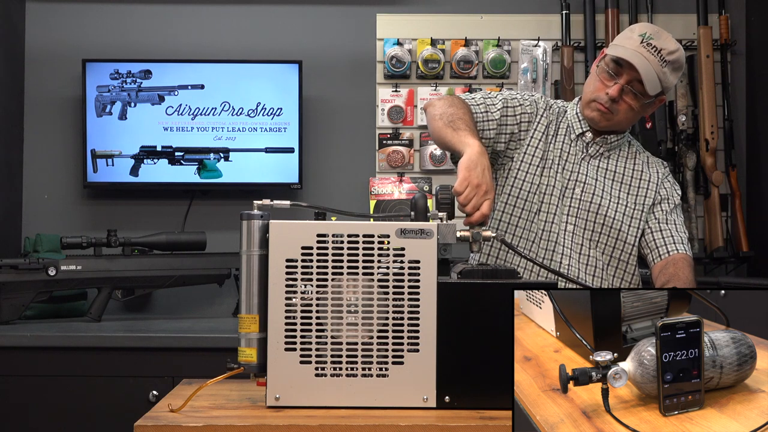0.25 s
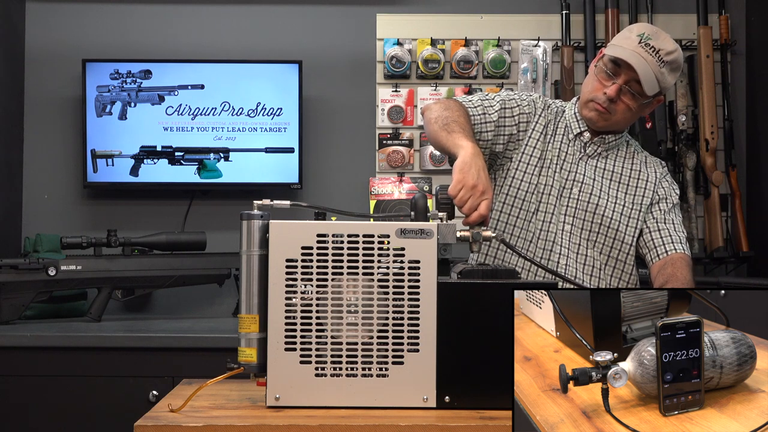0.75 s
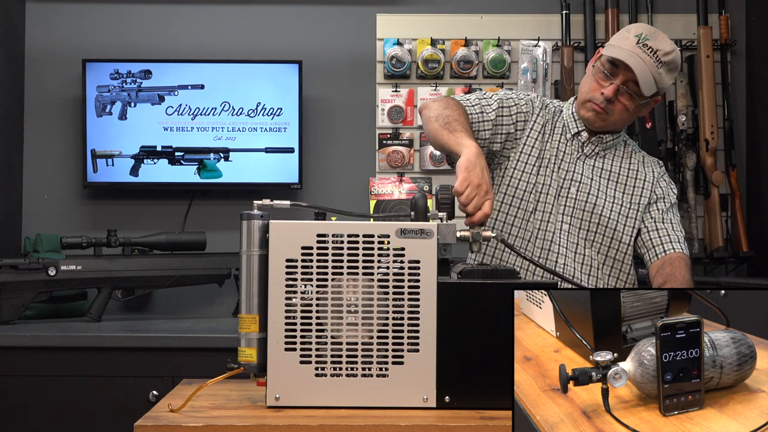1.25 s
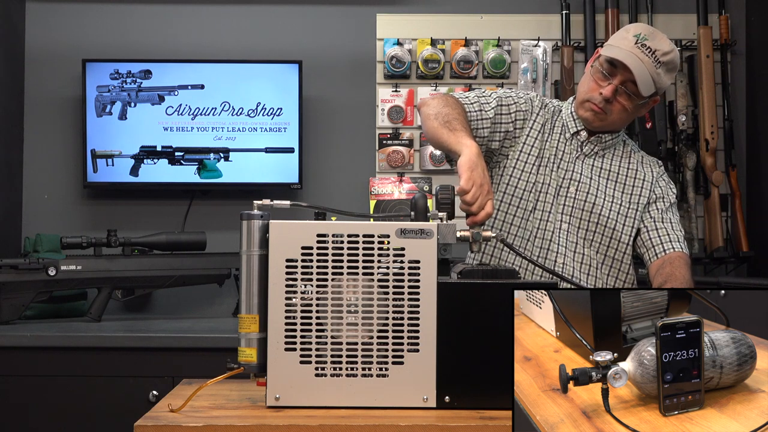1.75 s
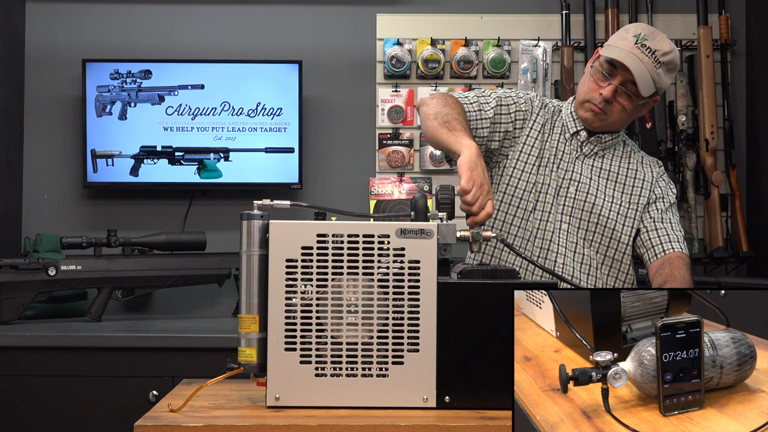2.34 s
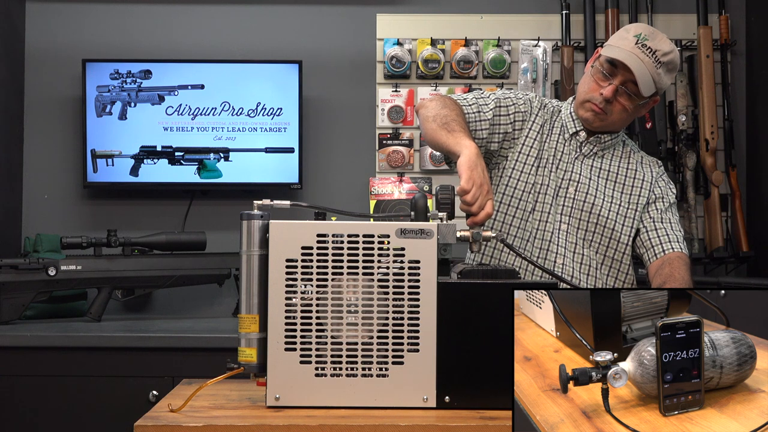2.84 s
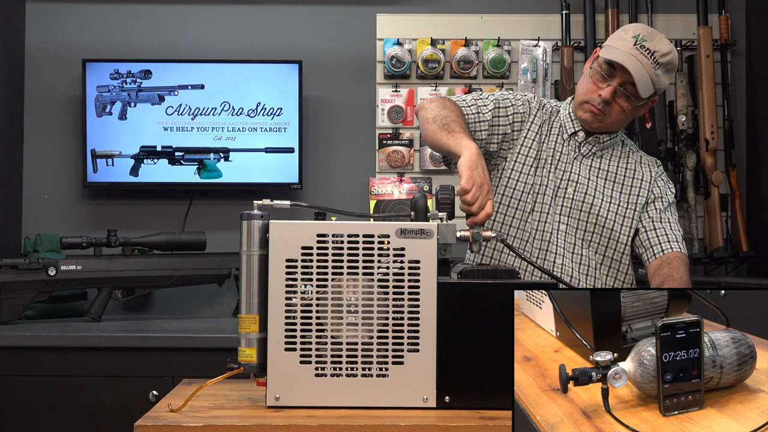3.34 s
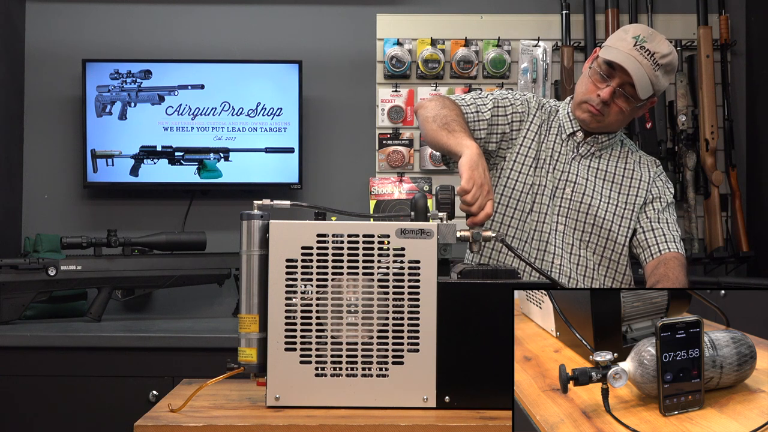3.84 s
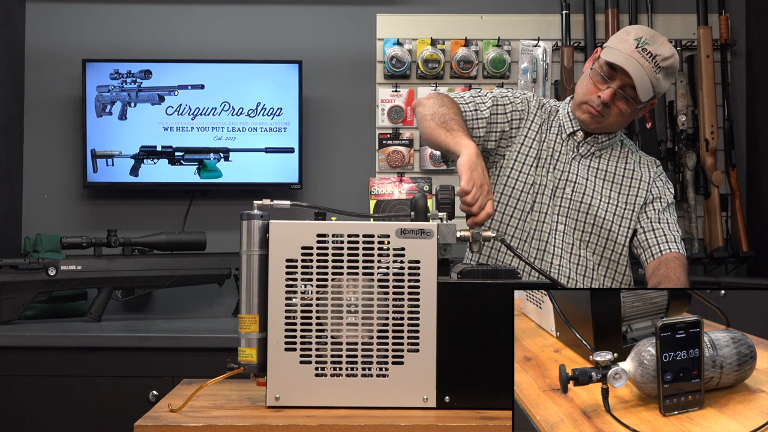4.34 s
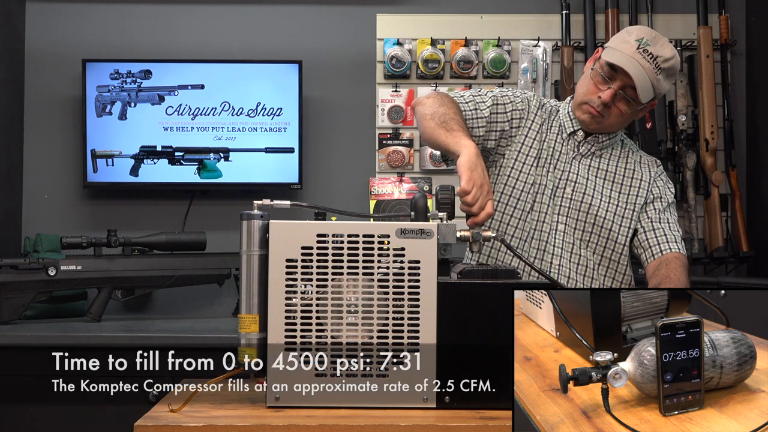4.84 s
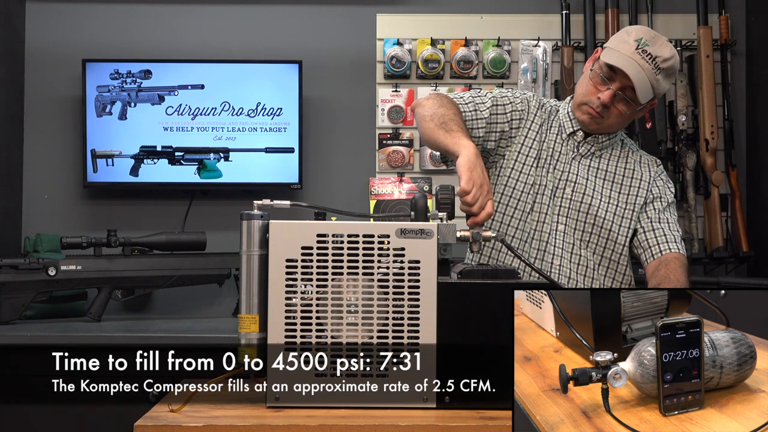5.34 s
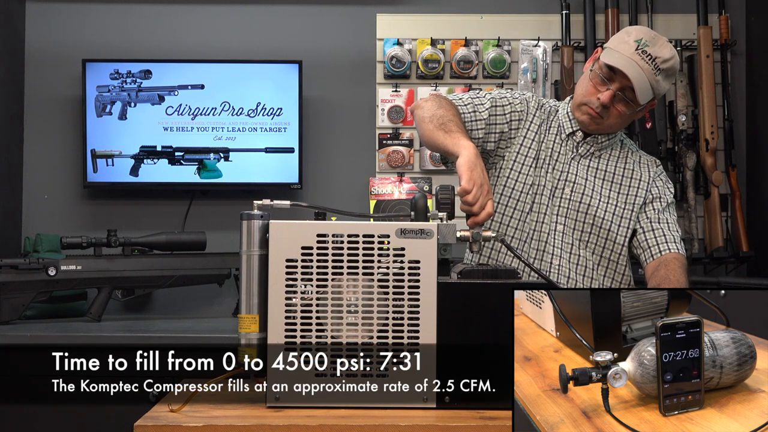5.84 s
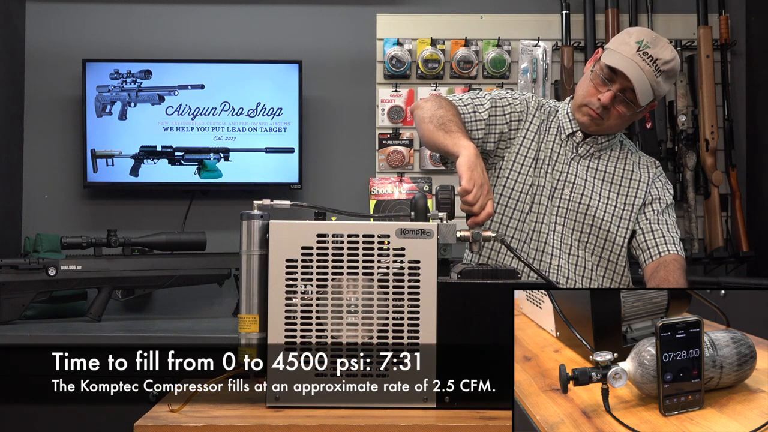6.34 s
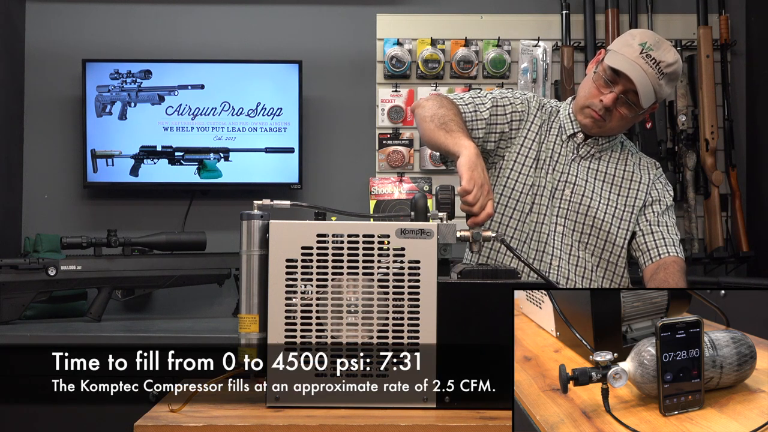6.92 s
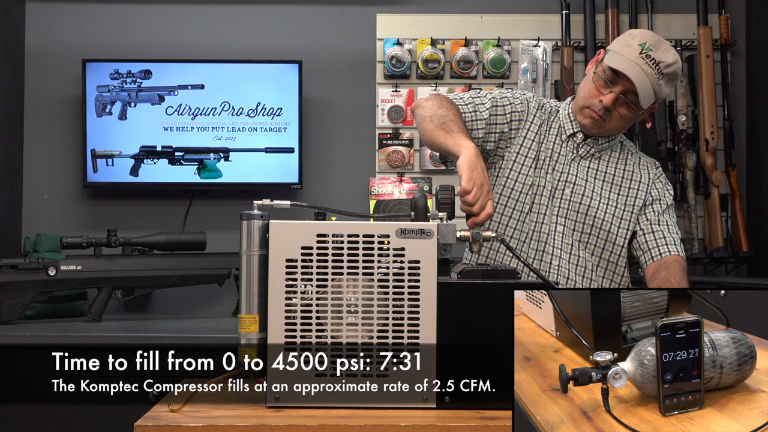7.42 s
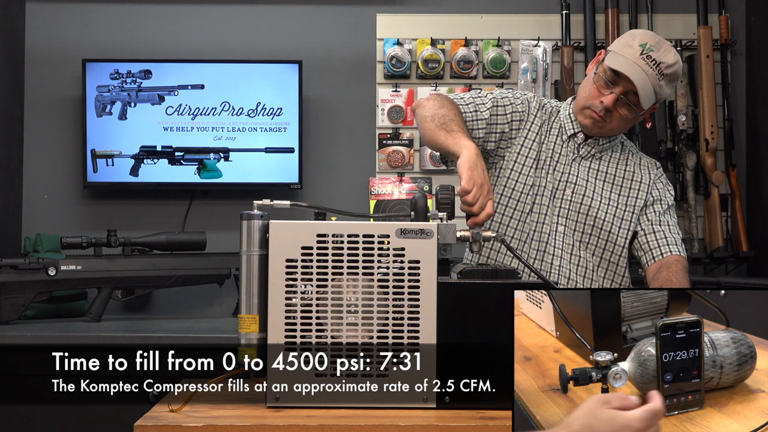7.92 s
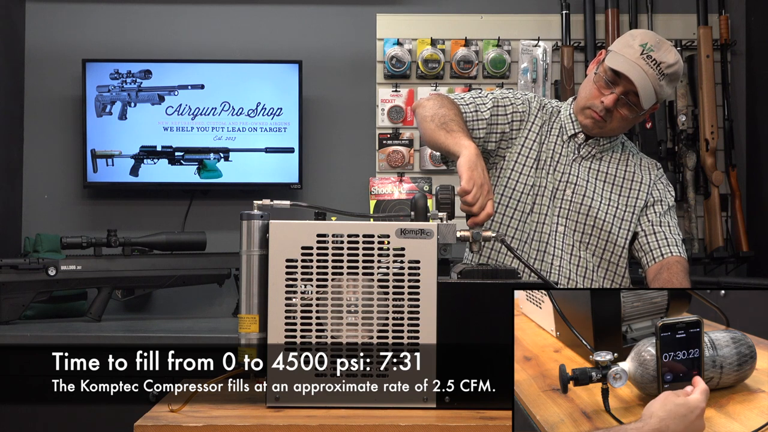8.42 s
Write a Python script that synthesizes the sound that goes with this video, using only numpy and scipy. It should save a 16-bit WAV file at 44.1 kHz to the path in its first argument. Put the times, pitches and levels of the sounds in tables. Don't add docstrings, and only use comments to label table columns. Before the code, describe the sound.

Close, almost mono capture in a small, dry workshop. Harsh compressed air is already rushing at the start, then chokes off quickly into a weak fading seep over quiet rumble and hum. After roughly a second the jet snaps open again, slightly softer, and keeps blowing continuously. Its hissing colour flutters and slides with the fingers round the knob, with brief watery, ringing emphasis in the later half.

```python
import sys
import numpy as np
from scipy import signal
from scipy.fft import rfft, irfft
from scipy.io import wavfile
from scipy.ndimage import uniform_filter1d

SR = 44100
rng = np.random.default_rng(int(sys.argv[2]) if len(sys.argv) > 2 else 0)


def file_out(sig):
    cols = np.atleast_2d(sig).T
    lim = np.clip(cols, -1, 1)
    pcm = np.round(lim * 32767).astype(np.int16)
    wavfile.write(sys.argv[1], SR, pcm)


def gain_from_db(level_db):
    decades = np.asarray(level_db, float) / 20
    return 10 ** decades


N = 382788
FRAME = 1024

# [f/Hz, density/dB]
SHOP_RUMBLE = [(12, -42), (20, -11), (64, -2), (86, -18), (237, -15), (495, -18), (632, -12), (1000, -29),
               (1300, -51), (2200, -120)]
# [f/Hz, rms level/dB]
HUM = [(59.2, -79), (236.9, -80.5)]
# [t/s, peak level/dB, f/Hz]
KNOCKS = [
    (.965, -63, 36),
    (1.59, -63, 38),
]
# [t/s, low f/Hz, high f/Hz, level/dB]
SIDE_BURSTS = [(0.575, 6800.0, 8360.0, -26), (0.578, 12400.0, 13790.0, -36.8),
               (1.898, 11710.0, 14480.0, -33.4), (2.364, 14550.0, 15850.0, -45.0),
               (2.366, 11710.0, 13100.0, -37.0), (2.83, 11020.0, 12900, -33.7),
               (3.479, 9550.0, 11030.0, -31.8), (3.481, 13090.0, 14480.0, -40.4),
               (3.852, 13090.0, 14480.0, -38.1), (5.939, 4130.0, 5260.0, -30), (5.94, 8300, 9650.0, -24),
               (6.498, 11020.0, 12410.0, -33.1), (7.567, 13780.0, 15850.0, -38.7),
               (7.568, 10330.0, 11810.0, -30.6), (8.403, 8240, 9740.0, -25), (8.669, 6880.0, 9740.0, -30),
               (8.669, 14460.0, 15850.0, -41.9)]

# [f/Hz, density/dB]
LEAK_HISS = [(250.0, -27), (500.0, -18.5), (1200.0, -17), (2200.0, -9.5), (3300.0, 0.5), (5000.0, -6.5),
             (7500.0, -11), (9500.0, -10.2), (11500.0, -24), (15650.0, -28.8)]
# [f/Hz, width/Hz, level/dB]
LEAK_FITTINGS = [(1620, 120.0, 5), (1780, 190.0, -6), (2140.0, 120.0, -9), (2970, 270, 9),
                 (3200, 230.0, -4), (3600.0, 84, 8.5), (4100.0, 360, -5), (5240.0, 410.0, 5.5),
                 (6100.0, 170.0, -4.6), (6830.0, 220.0, 4), (7420.0, 290.0, 5), (8080.0, 900.0, -6.5),
                 (8570.0, 400.0, 8.1), (9530.0, 380.0, 5.5), (9990.0, 300.0, -5.6), (10670.0, 360.0, -3.2),
                 (11570.0, 760.0, 3.6), (12680.0, 210.0, -2.9), (13440.0, 350.0, -4.0),
                 (15590.0, 900.0, 2.8)]

# [f/Hz, density/dB]
JET_ROAR = [(20, -34.5), (250.0, -30), (500.0, -22), (900.0, -16), (1400.0, -9.5), (2200.0, -14),
            (3500.0, -6.5), (5500.0, -2.5), (9000.0, 0.5), (12500.0, -9), (15650.0, -14)]
# [f/Hz, width/Hz, level/dB]
HOUSING = [(1070, 130.0, -2.2), (1535, 180, 2), (2380, 91, 3.5), (2670, 320, -2.5), (2780, 90, 5),
           (3594, 180, 3), (4370, 250, 3), (4830, 170, -1.2), (5880, 150, 2.5), (6040, 180, -2.5),
           (6540, 380, 2), (7360, 230, 2.5), (8340, 190, 1.5), (11650, 200, 2)]
# [t/s, jet level/dB]
FLOW = [(.3, -14), (1.86, -15), (2.32, -17), (2.44, -15), (2.8, -17), (3.49, -17), (3.82, -19.5),
        (4.47, -19), (4.53, -19.5), (4.61, -15.5), (4.97, -18), (5.49, -18), (5.55, -16.5), (5.97, -19.5),
        (6.24, -17), (6.72, -19.5), (7.59, -16.5), (8.68, -19)]
# [t/s, level/dB, fading/s]
SPITS = [
    (2.45, 2, 0.63),
    (4.63, 4.5, .45),
    (5.62, 3, .4),
    (5.9, 6.5, 0.73),
    (6.55, 5.5, 0.75),
    (6.85, 3.5, 0.36),
]

# [f/Hz, width/Hz, level/dB]
CUPPED = [(1050, 500, 1.5), (2860, 370, 4), (3610, 360, 3), (5260, 660, 7), (6460, 270, 3),
          (7200, 250, 1.2), (8070, 420, -5.5), (8650, 420, 5), (9420, 270, 5), (9860, 300, -1.5),
          (11000, 320, 0.5), (11900, 400, 0.5), (13300, 700, -3), (14200, 450, 0.5)]
# [f/Hz, width/Hz, level/dB]
LIFTED = [(2560, 550, -2.8), (5140, 500, -6), (6200, 450, 3.5), (7150, 630, -8), (8310, 420, 1.5),
          (9200, 340, -10), (10510, 250, 3.7), (12030, 920, 2.1), (13520, 530, 3), (14730, 600, -4.8)]
# [f/Hz, width/Hz, level/dB]
SLIDING = [(2460, 180, -6), (3460, 910, 4), (4420, 460, 6), (4660, 1660, -3), (6230, 940, 7.5),
           (6880, 1000, -7), (9200, 1000, -7), (10070, 3500, 3.5), (13480, 360, 5), (15060, 1230, -3.4)]
# [f/Hz, width/Hz, level/dB]
PINCHED = [(2720, 680, -2), (3070, 320, 4), (4800, 610, -3), (5780, 700, 4.5), (6400, 290, -2.5),
           (8380, 620, -6), (9190, 640, 8.5), (9950, 240, 4.5), (10270, 430, -7), (11500, 320, 4.5),
           (11940, 1400, -4.5), (13350, 400, 2.5), (14000, 500, 1.1), (14900, 700, -5)]
# [f/Hz, width/Hz, level/dB]
CLENCHED = [(2180, 800, 2), (5200, 680, -2.5), (5940, 400, 3.5), (6470, 300, 3.5), (7830, 1430, -5.5),
            (8600, 880, 6), (9600, 300, -2), (10500, 300, -3), (11000, 600, 1), (11700, 400, 0),
            (12780, 440, 5), (13080, 250, -5), (14000, 600, 5.5), (14900, 1450, 5)]
# [f/Hz, width/Hz, level/dB]
ROLLED = [(1260, 760, -3), (3050, 230, -5.5), (3670, 480, -7), (4040, 240, 3.5), (5300, 1200, -1),
          (6670, 1250, 3.5), (7810, 880, -7), (9350, 1070, 7.5), (10600, 1270, -6), (11060, 400, 6),
          (12030, 1100, 6), (13500, 300, -3), (14300, 320, -2.1), (14500, 1560, 6)]
# [start t/s, end t/s, shape, gap pitch shift at start/%, at end/%]
HOLDS = [(0, .64, CUPPED, 0.5, -2), (1.84, 2.45, CUPPED, -0.5, 0.5), (3.05, 3.755, CUPPED, 1, 3.5),
         (3.785, 3.85, LIFTED, -.7, 0), (3.88, 3.968, SLIDING, -1, 2), (4.008, 4.548, PINCHED, 0, -0.7),
         (5.15, 5.66, PINCHED, 1.3, 4), (5.952, 6.6, CLENCHED, 1, 1), (6.806, 7.05, CLENCHED, -1, -.1),
         (7.183, 7.42, ROLLED, -1.5, -0.5), (7.52, 7.9, ROLLED, 1.8, 1.5), (8.25, 8.66, ROLLED, 1.8, .4)]
# [f/Hz, width/Hz, level/dB]
LOOSE = [
    [(14350, 410, 4), (11250, 300, -6), (6440, 200, -3), (10900, 350, 4)],
    [(10640, 270, -1), (13200, 250, 4), (15000, 2500, -4), (7600, 250, -3), (11050, 350, -4)],
    [(14000, 500, 4), (15000, 2000, -3), (6100, 200, -3), (7150, 250, -4)],
    [],
    [],
    [(11000, 410, 4.5), (6300, 230, -6), (8350, 350, -4), (12200, 1200, 2), (3300, 900, 2.5)],
    [(10150, 350, 2), (6900, 550, -4), (10650, 300, -3), (8700, 270, -1)],
    [(10600, 250, -5), (9800, 250, -3), (13250, 300, 2.5)],
    [(11150, 500, 7), (13200, 600, 9), (9200, 770, 2.1), (5900, 500, -4.5), (15000, 1200, 2.1)],
    [(12000, 790, -8), (14200, 1600, -2), (9400, 400, -3), (10900, 250, -4)],
    [(14600, 1600, -5), (10600, 760, 5)],
    [(10750, 450, 4), (11300, 250, -4), (4950, 700, 2.1), (13900, 2500, 2)],
]
# [letting go t/s, pitch shift/%]
TWISTS = [
    (3.765, 4.5),
    (3.985, -3),
    (5.88, 0),
    (7.47, 0),
]


def level(x, db):
    return x * gain_from_db(db) / np.sqrt(np.mean(x ** 2))


def slope(points, hz):
    at_hz, db = np.transpose(points)
    return np.interp(np.log(hz + 1), np.log(at_hz), db)


def bells(modes, hz):
    return sum(db * np.exp(-np.log(16) * ((hz - at_hz) / width) ** 2) for at_hz, width, db in modes)


def turbulence(colour_db):
    overlap = FRAME * 3 // 4
    hz, s, z = signal.stft(rng.standard_normal(N), SR, nperseg=FRAME, noverlap=overlap)
    gain = gain_from_db(colour_db(hz[:, None], s[None, :]) + 0 * s)
    gain = gain / np.sqrt(np.mean(gain ** 2, axis=0))
    return signal.istft(z * gain, SR, nperseg=FRAME, noverlap=overlap)[1][:N]


def walk(rate_hz):
    hold = int(SR / rate_hz)
    steps = np.repeat(rng.standard_normal(N // hold + 1), hold)
    return 1.3 * uniform_filter1d(uniform_filter1d(steps, hold), hold)[:N]


def side_bursts():
    grid_start = 868
    side = np.zeros(N + 4 * FRAME)
    hz = np.fft.rfftfreq(2 * FRAME, 1 / SR)
    window = np.kaiser(2 * FRAME, 5)
    for s, low_hz, high_hz, db in SIDE_BURSTS:
        noise = rng.standard_normal(2 * FRAME)
        band = irfft(rfft(noise) * ((hz > low_hz) & (hz < high_hz)))
        start = grid_start + FRAME * round((s * SR - grid_start) / FRAME + .1)
        side[start:start + 2 * FRAME] += window * level(band, db + 1.0)
    return side[FRAME:FRAME + N]


def room(x):
    t60_s, tail_db = 0.32, -12.5
    t = np.arange(SR // 2) / SR
    tail = rng.standard_normal(len(t)) * np.exp(-np.log(1000) * t / t60_s) * (t > .002)
    tail = signal.lfilter([1], [1, -.3], tail)
    tail = tail / np.sqrt(np.sum(tail ** 2))
    return x + gain_from_db(tail_db) * signal.fftconvolve(x, tail)[:N]


def shop():
    t = np.arange(N) / SR
    sound = turbulence(lambda hz, s: slope(SHOP_RUMBLE, hz)) * gain_from_db(-69)
    for hz, db in HUM:
        sound += gain_from_db(db + 2 * walk(8)) * np.sqrt(2) * np.sin(2 * np.pi * hz * t)
    for s, db, hz in KNOCKS:
        thud = np.exp(-((t - s) / .042) ** 2)
        sound += gain_from_db(db) * thud * np.sin(2 * np.pi * hz * (t - s))
    return sound


def leak():
    hiss = turbulence(lambda hz, s: slope(LEAK_HISS, hz) + bells(LEAK_FITTINGS, hz))
    return hiss * gain_from_db(-47.5 + .8 * walk(24.05))


OPEN_AT_S = 1.784


def flow_db(s):
    return np.where(s < OPEN_AT_S, FLOW[0][1], np.interp(s, *np.transpose(FLOW)))


def valve(s):
    shut_at_s, shut_s, open_s = 0.62, 0.041, 0.073
    trapped_db, trapped_t60_s = -31.5, 1.6
    since = np.maximum(s - shut_at_s, 0)
    closing = np.exp(-(since / shut_s) ** 1.76)
    trapped = gain_from_db(trapped_db - 60 * since / trapped_t60_s)
    return closing + trapped + np.clip((s - OPEN_AT_S) / open_s, 0, 1)


def drain_pipe(hz, s):
    rise_s, rest_db = 0.069, -1
    ring_db = rest_db + sum(np.interp(s, [at - rise_s, at, at + fading], [0, db, 0])
                            for at, db, fading in SPITS)
    return bells([(4330, 650, ring_db)], hz)


def hand(hz, s):
    tightness = 1.103
    wind_s, let_go_s = 0.13, 0.02
    edges = np.ravel([hold[:2] for hold in HOLDS])
    shift = np.interp(s, edges, np.ravel([hold[3:] for hold in HOLDS]))
    for at, percent in TWISTS:
        shift = shift + np.interp(s, [at - wind_s, at, at + let_go_s], [0, percent, 0])
    pitch = 1 + shift / 100
    db = np.zeros(np.broadcast(hz, s).shape)
    for shape in (CUPPED, LIFTED, SLIDING, PINCHED, CLENCHED, ROLLED):
        weight = np.interp(s, edges, np.repeat([hold[2] == shape for hold in HOLDS], 2))
        held = weight[0] > 0
        gaps_db = bells(shape, hz / np.clip(pitch[:, held], .9, 1.1))
        db[:, held] += tightness * weight[:, held] * gaps_db
    for k, fingers in enumerate(LOOSE):
        weight = np.interp(s, edges, np.arange(len(edges)) // 2 == k)
        db += weight * bells(fingers, hz / pitch)
    return db


def jet_colour(hz, s):
    surge_db = flow_db(s) - np.mean(flow_db(s))
    low_db = -0.03 * surge_db
    top_db = 0.13 * surge_db - 11 * (1 - np.minimum(valve(s), 1)) ** 4
    low_share = 1 / (1 + (hz / 3500) ** 4)
    top_share = 1 / (1 + (11000 / (hz + 1)) ** 8)
    body_db = slope(JET_ROAR, hz) + bells(HOUSING, hz) + drain_pipe(hz, s)
    return body_db + low_share * low_db + top_share * top_db + hand(hz, s)


def jet():
    t = np.arange(N) / SR
    eddies_db = 0.53 * walk(300) + 0.37 * walk(20)
    return turbulence(jet_colour) * valve(t) * gain_from_db(flow_db(t) + eddies_db)


def scene():
    return np.tile(room(jet() + leak()) + shop(), (2, 1))


def top_cut(x):
    return signal.sosfilt(signal.butter(12, 16250, fs=SR, output="sos"), x)


def record(dry):
    wide = dry + side_bursts() * np.array([[1], [-1]])
    low_pass = signal.ellip(12, .2, 80, 15750, fs=SR, output="sos")
    mix = signal.sosfilt(low_pass, wide)
    return top_cut(mix)


dry = scene()
out = record(dry)
file_out(out)
```